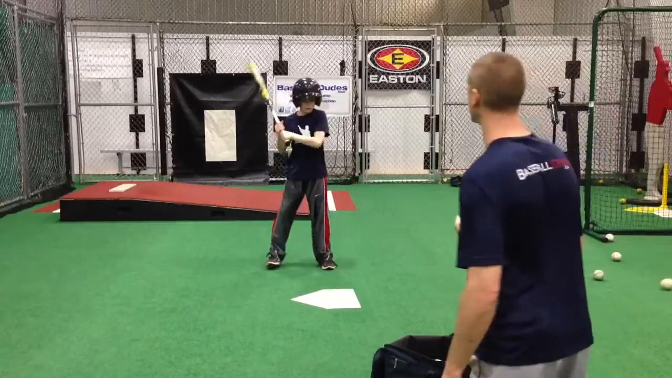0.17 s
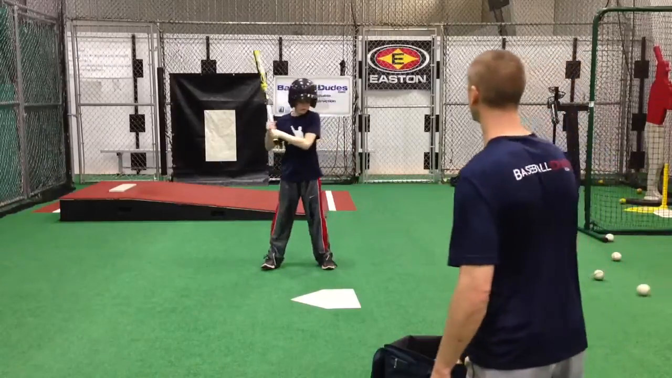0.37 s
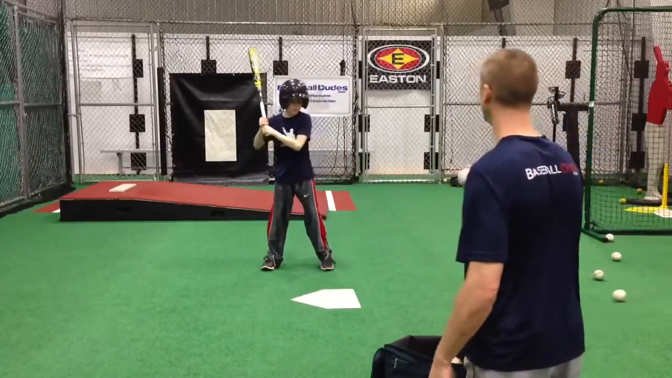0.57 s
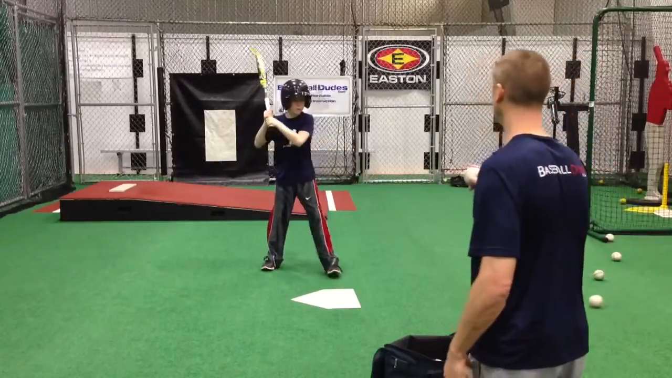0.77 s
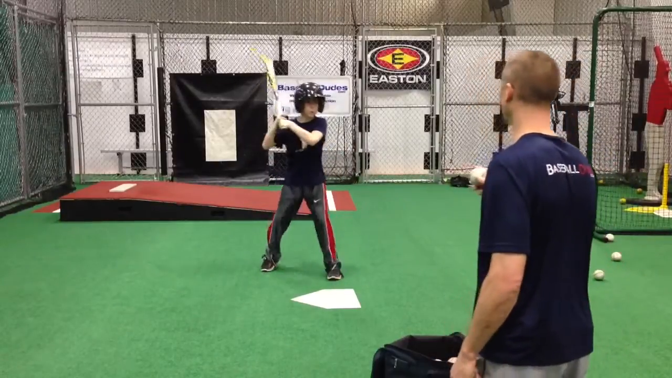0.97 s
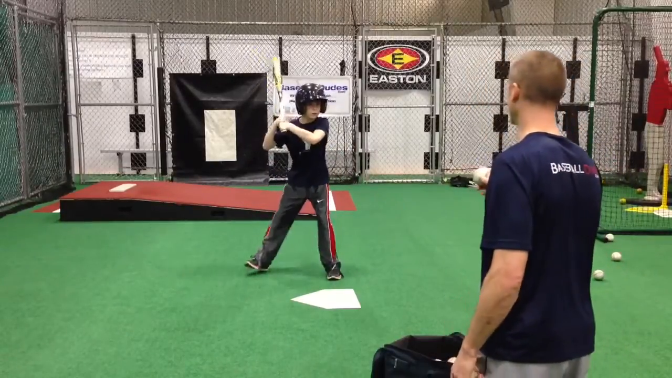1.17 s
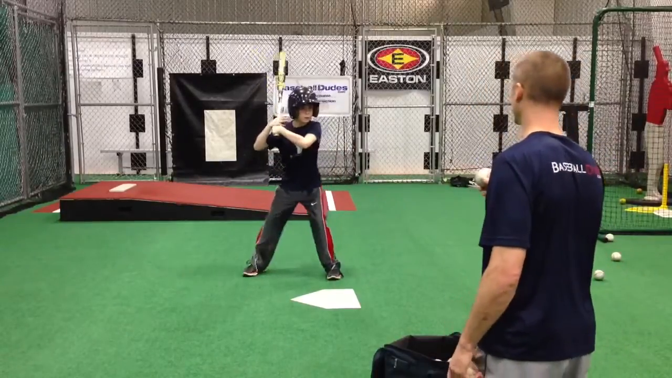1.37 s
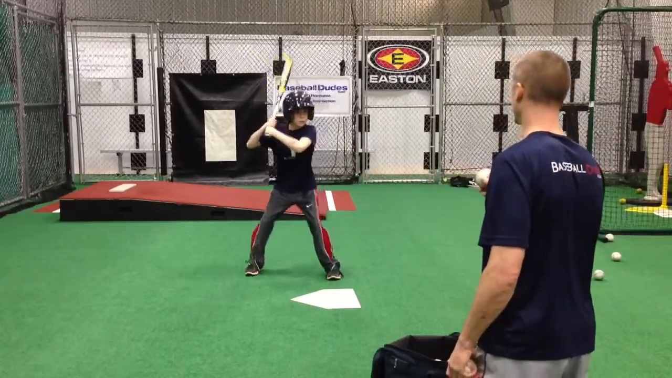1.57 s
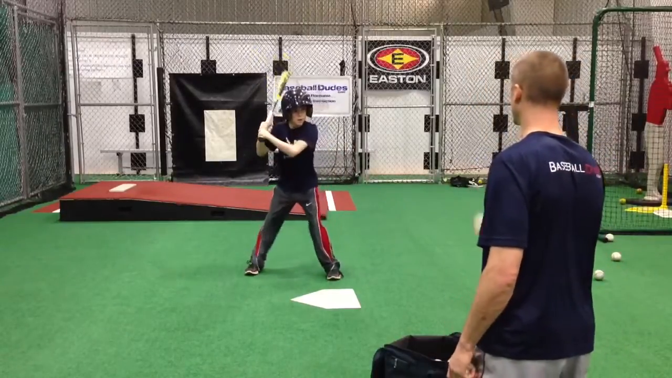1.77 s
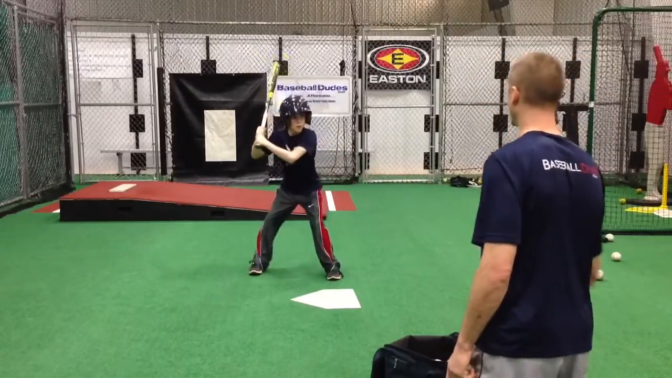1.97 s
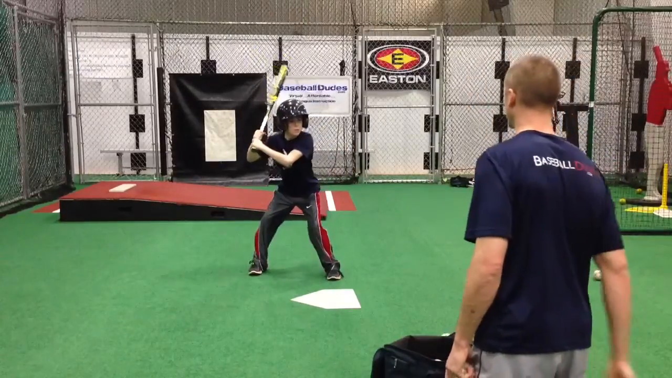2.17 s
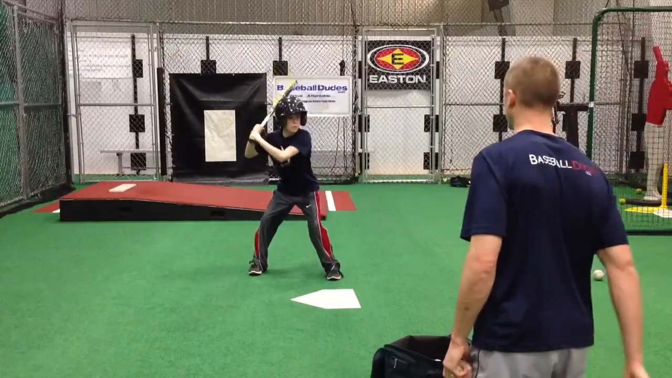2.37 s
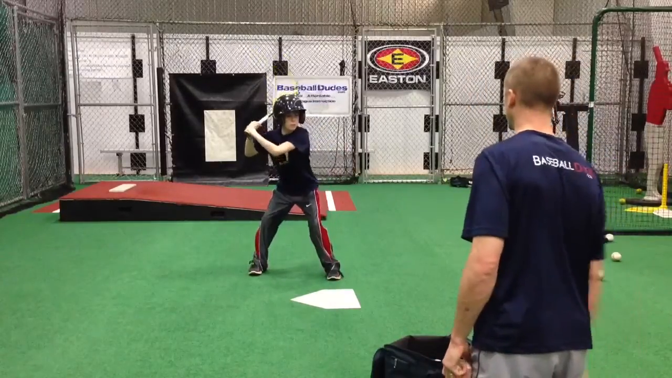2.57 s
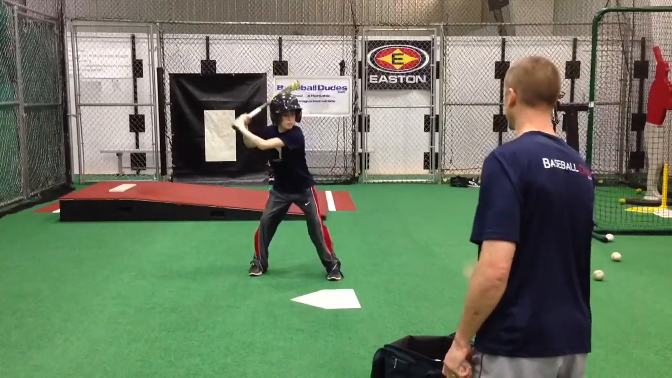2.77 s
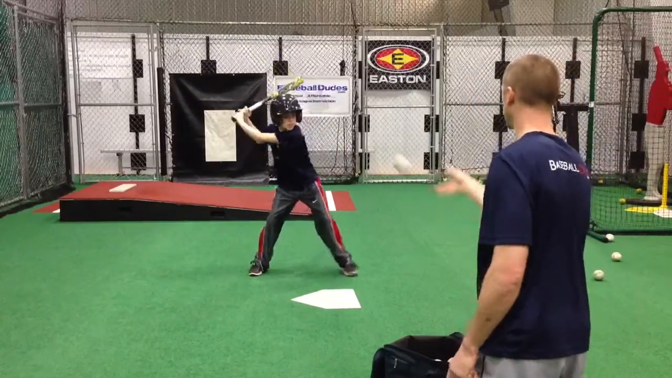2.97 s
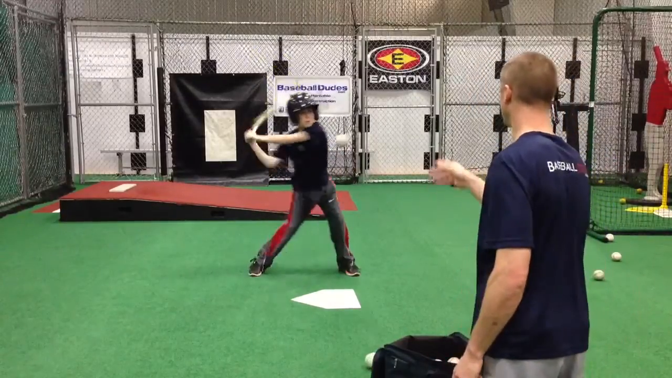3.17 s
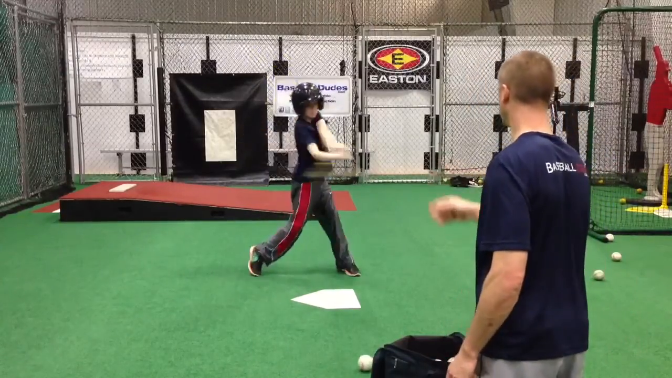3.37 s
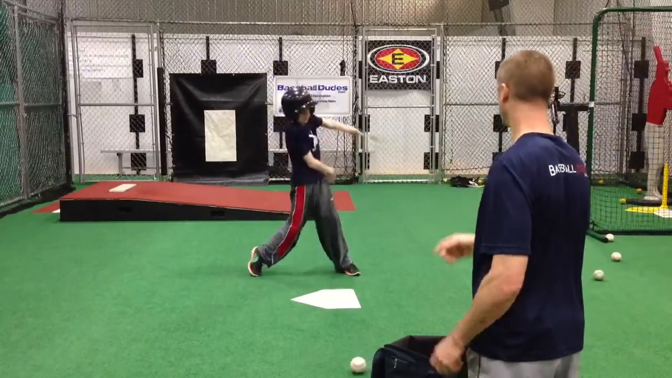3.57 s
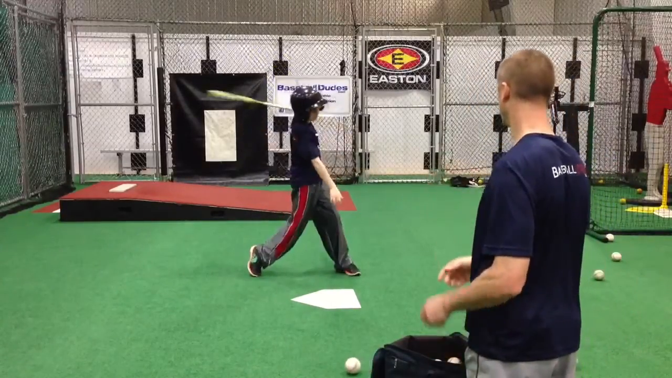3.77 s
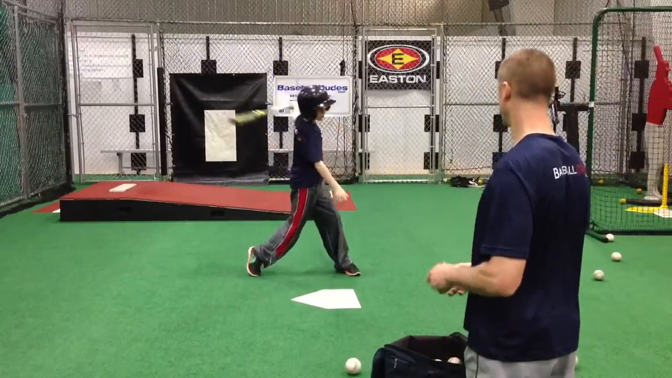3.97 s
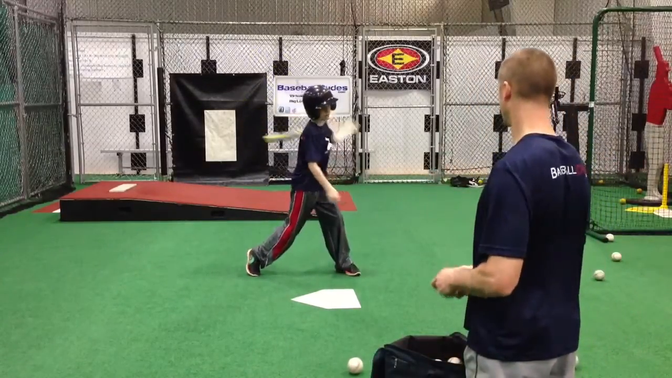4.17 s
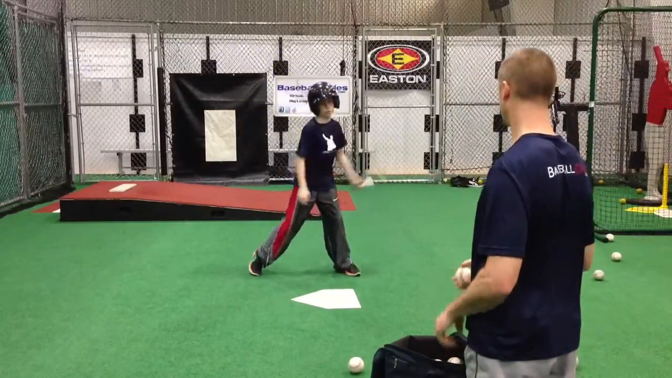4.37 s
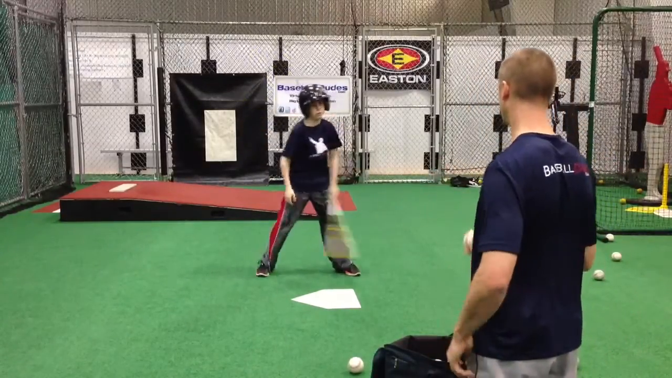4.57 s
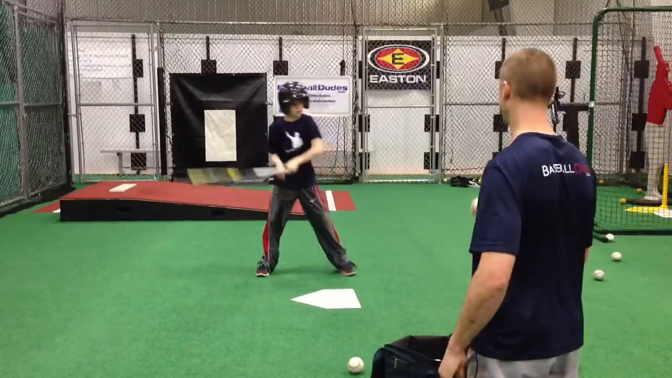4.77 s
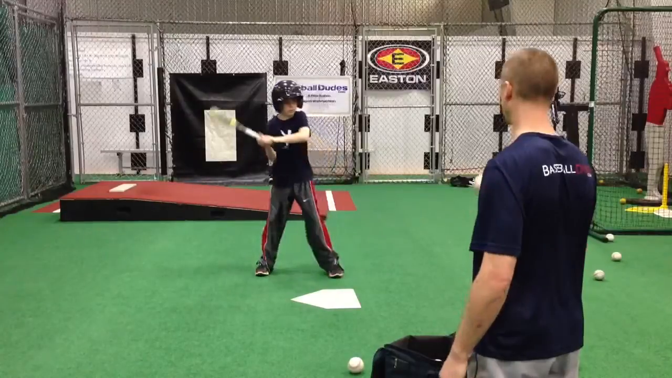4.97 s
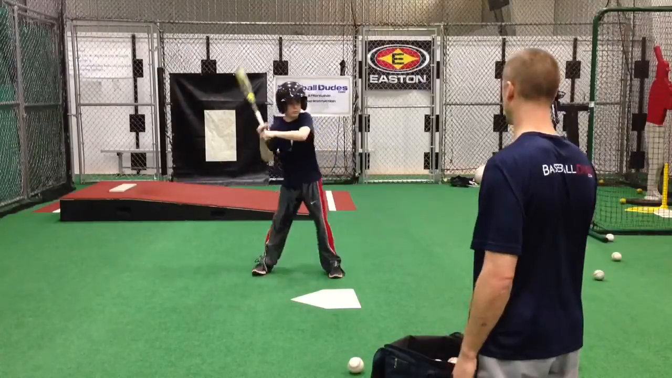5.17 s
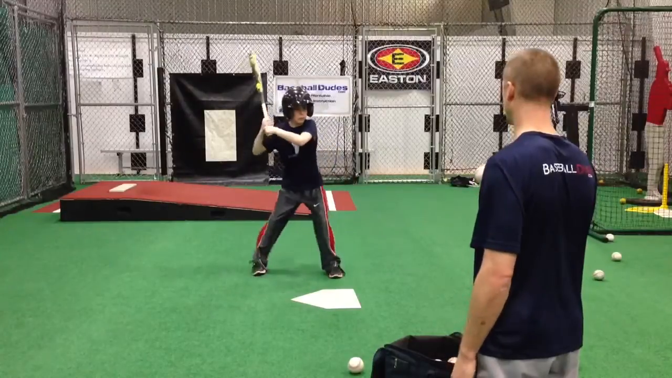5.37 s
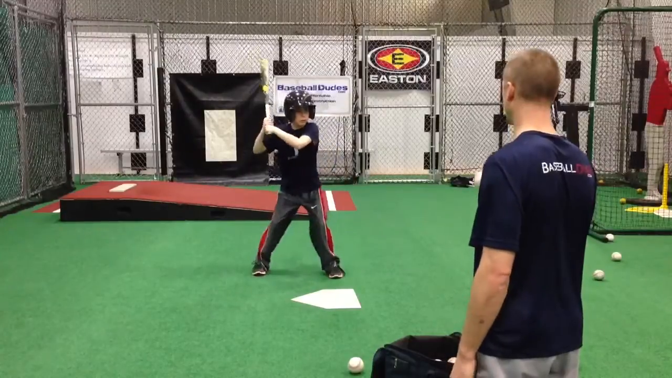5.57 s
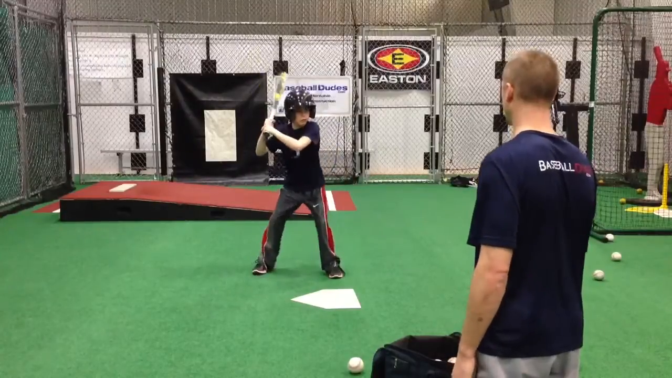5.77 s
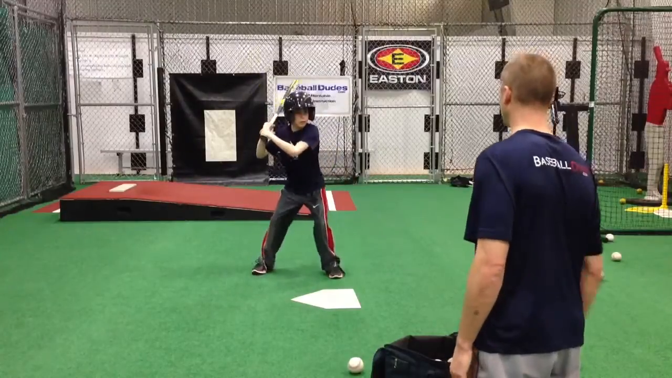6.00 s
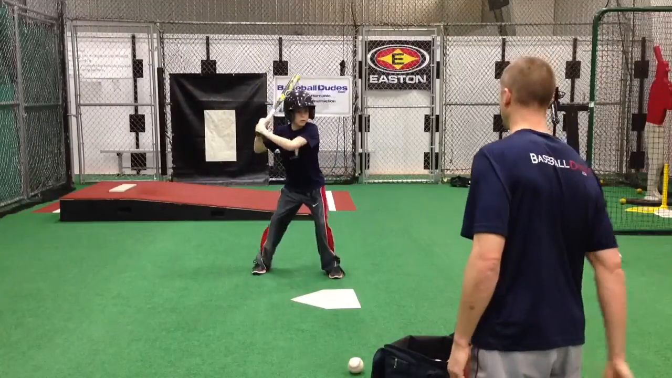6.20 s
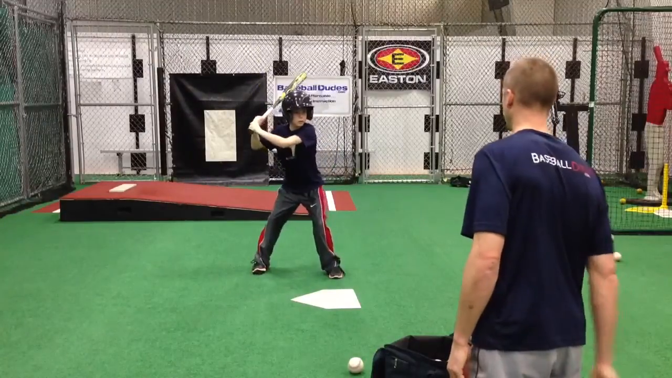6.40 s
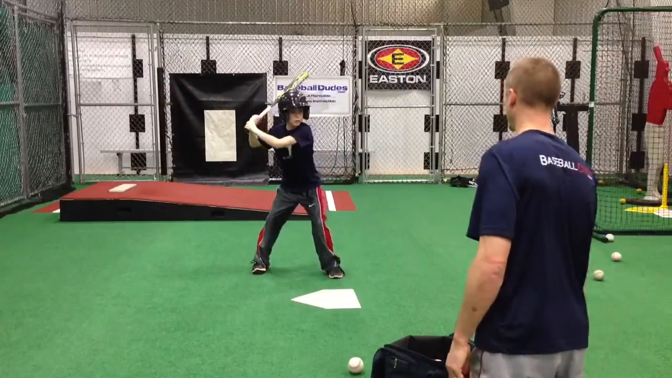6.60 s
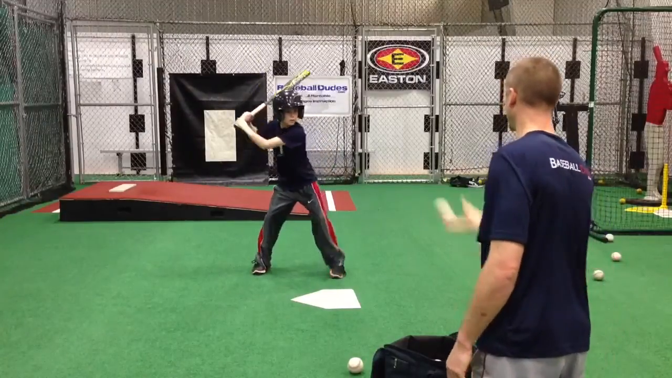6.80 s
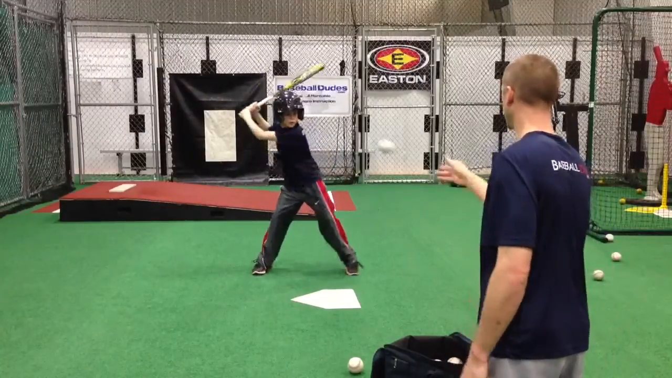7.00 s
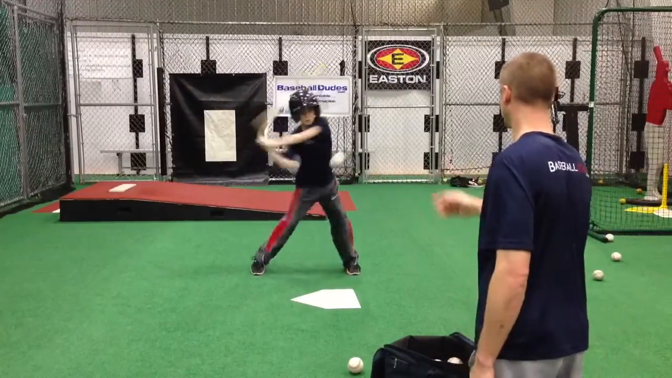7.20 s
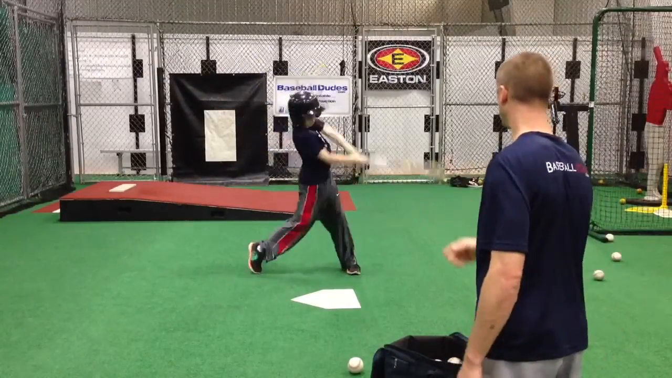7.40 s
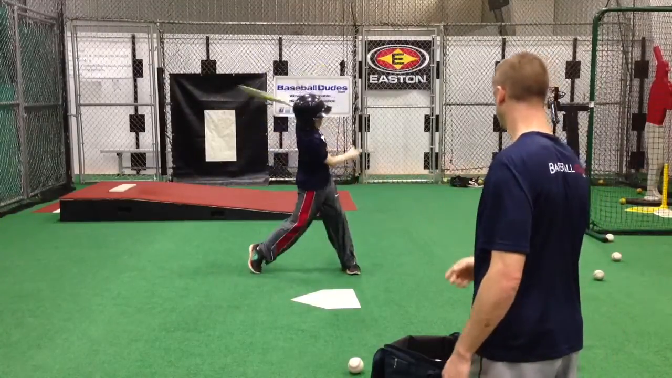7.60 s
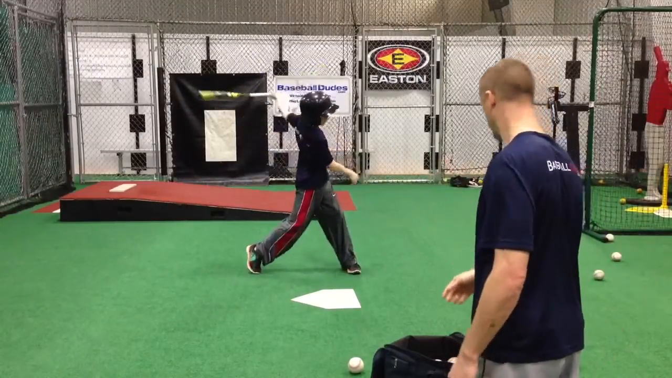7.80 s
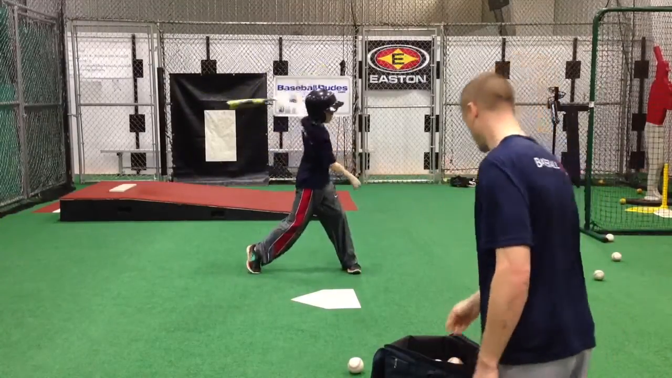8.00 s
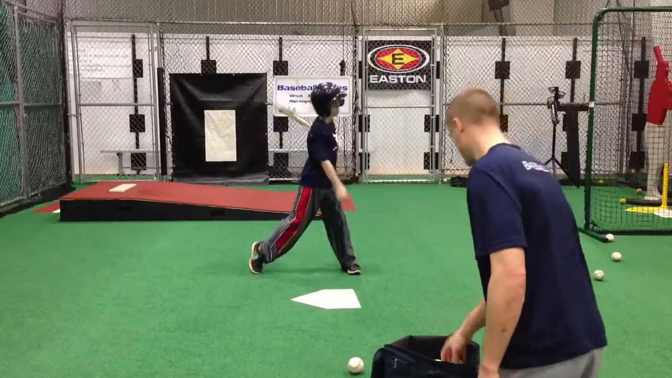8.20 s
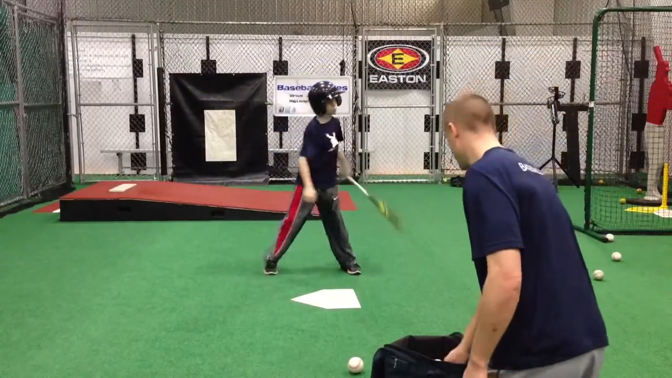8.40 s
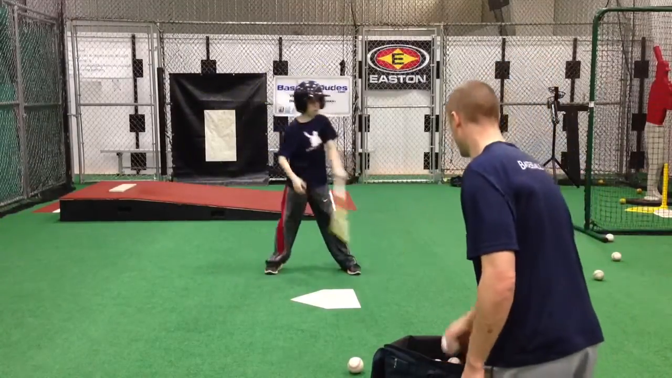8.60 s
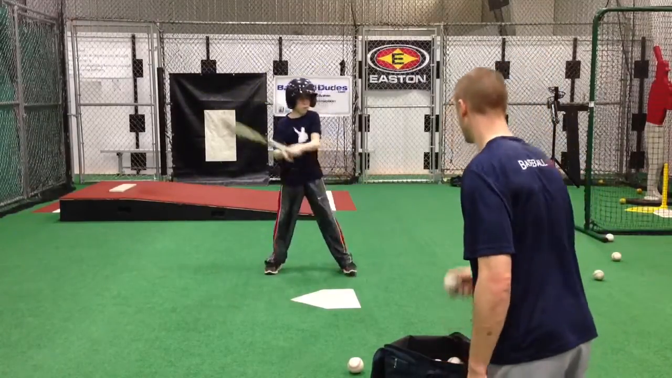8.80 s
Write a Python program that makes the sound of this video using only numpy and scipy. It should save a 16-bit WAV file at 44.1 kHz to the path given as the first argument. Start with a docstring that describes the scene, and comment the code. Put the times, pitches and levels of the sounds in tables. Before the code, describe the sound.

Batting practice inside a large, reverberant cage, heard from a fixed microphone a few metres away. Quiet air hum and soft scuffing come first, then an explosive metallic crack whose ping wavers off the walls. The ball snaps sharply into rattling mesh and thumps down close by, bouncing weaker. Several seconds later a second hit brings another mesh snap and a hollower thud.

```python
"""An indoor batting cage in a hard hall: a metal bat cracks against balls over ventilation hum and small scuffs.
Each crack is a noise burst plus short damped modes, loud enough to clip the microphone, with a slap echo.
The barrel rings on as it swings, so every wall hears its ping at another pitch.
The ball snaps into wire mesh that rattles, then knocks on the turf with damped modes and a floor rumble.
The hall is noise that dies band by band, faint until the far wall answers."""
import sys
import numpy as np
from scipy import signal
from scipy.fft import rfft, irfft
from scipy.io import wavfile
from scipy.ndimage import uniform_filter1d

SR = 44100
rng = np.random.default_rng(int(sys.argv[2]) if len(sys.argv) > 2 else 0)


def wav_record(signal):
    """Record a signal, one row per channel, as 16-bit PCM in the file named by sys.argv[1]."""
    frames = np.transpose(np.atleast_2d(signal))
    bounded = np.clip(frames, -1, 1)
    # unit amplitude maps onto the largest positive 16-bit level
    quanta = np.round(bounded * 32767).astype(np.int16)
    wavfile.write(sys.argv[1], SR, quanta)


N = 390285  # length in samples


def undb(db):
    """Amplitude factor of a level in dB."""
    return 10 ** (np.asarray(db) / 20)


def fall(size, t60_s):
    """Exponential decay that loses 60 dB in t60_s."""
    return np.exp(-np.log(1000) * np.arange(size) / SR / t60_s)


def add(track, sound, start_s):
    """Mix a sound into a track, cut off at the track's end."""
    start = max(int(start_s * SR), 0)
    track[start:start + len(sound)] += sound[:len(track) - start]


def low_cut(x, order, cutoff_hz):
    """Butterworth high-pass."""
    return signal.sosfilt(signal.butter(order, cutoff_hz, "high", fs=SR, output="sos"), x)


def on_log_axis(table, hz):
    """Read a two-column table between its points, on a logarithmic frequency axis."""
    table_hz, values = np.transpose(table)
    return np.interp(np.log(hz + 1), np.log(table_hz), values)


def colour(x, spectrum):
    """Causal filter with the given gains in dB, from the cepstrum of their logarithm."""
    gain_db = on_log_axis(spectrum, np.fft.rfftfreq(4096, 1 / SR))
    cepstrum = irfft(gain_db * np.log(10) / 20)
    # folding the second half onto the first puts all the energy after the onset
    cepstrum[1:2048] *= 2
    cepstrum[2049:] = 0
    impulse = irfft(np.exp(rfft(cepstrum)))[:2048]
    return signal.fftconvolve(x, impulse)[:len(x)]


def unit(x):
    """Scale to an RMS of 1."""
    return x / np.sqrt(np.mean(x ** 2))


def snap(spectrum, size):
    """One click with the given colour, peak 1."""
    click = colour(np.arange(size) == 0, spectrum)
    return click / np.max(np.abs(click))


def ring(modes, size, spread_db):
    """Sum of damped sine modes, each struck a little differently."""
    t = np.arange(size) / SR
    total = np.zeros(size)
    for pitch_hz, level_db, t60_s in modes:
        strength = undb(level_db + spread_db * rng.standard_normal())
        total += strength * np.sin(2 * np.pi * pitch_hz * t) * fall(size, t60_s)
    return total


def walk(rate_hz):
    """Wandering control signal: random levels held 1 / rate_hz seconds and slewed twice, spread near 1."""
    hold = int(SR / rate_hz)
    steps = np.repeat(rng.standard_normal(N // hold + 1), hold)
    return 1.1 * uniform_filter1d(uniform_filter1d(steps, hold), hold)[:N]


# how long the hall rings in each band: freq_hz [Hz], t60_s [s]
HALL_DECAY = [(125, 0.12), (350, 2), (900, 2.35), (1900, 2.21), (3500, 1.74), (6000, 1.2), (10000, 0.86),
              (15000, 0.27)]
EARLY_DB, EARLY_T60_S = 19.5, 0.2  # first dense echoes, over the late tail
BEFORE_DB = -11  # turf and nets, before the far wall answers
SLAP_S, NEAR_SLAP_S = .029, .039  # far wall's delay for a sound at the plate, and near the microphone


def hall(x, slap_s=SLAP_S):
    """Echoes of a short sound: faint until the far wall answers, then noise that dies band by band."""
    size = 1 << 16
    freq_hz, t, bands = signal.stft(rng.standard_normal(size), SR, nperseg=256)
    decay = undb(-60 * t / on_log_axis(HALL_DECAY, freq_hz)[:, None])
    tail = signal.istft(bands * decay, SR)[1][:size]
    tail *= 1 + undb(EARLY_DB) * fall(size, EARLY_T60_S)
    wall_times_s = [slap_s - .002, slap_s + 0.0021]
    tail *= undb(np.interp(np.arange(size) / SR, wall_times_s, [BEFORE_DB, 0]))
    return signal.fftconvolve(x, tail / 30)


# tone of the ventilation: freq_hz [Hz], level_db [dB per Hz, relative]
AIR_COLOUR = [(24, -71), (40, -60), (69, -41), (96, -15.5), (202, -4.5), (301, -8), (407, -2.5), (591, -5),
              (758, -1.5), (2450, -8.5), (3470, -7), (5860, -19), (14000, -22), (15500, -26.5)]
AIR_DB = -51.5  # overall RMS level


def air():
    """Ventilation: overlapping octave bands of noise that swell a little together and flicker alone."""
    noise = rfft(colour(rng.standard_normal(N), AIR_COLOUR))
    octave = np.log2(np.fft.rfftfreq(N, 1 / SR) / 62.5 + 1e-9)
    swell = walk(0.94)
    total = np.zeros(N)
    for k in range(-1, 10):
        crossfade = np.clip(1 - np.abs(octave - k), 0, 1)
        total += irfft(noise * crossfade, N) * undb(1.3 * swell + 0.12 * walk(3.8))
    return undb(AIR_DB) * unit(total)


# thin short tones: peak_s [s], level_db [dB], half_length_s [s], pitch_hz [Hz]
TONE_EVENTS = [(3.85, -44.5, 0.048, 6850)]
TONE_HALL_DB = -22


def tone(level_db, half_length_s, pitch_hz):
    """A brief sine with a slight waver, which the hall draws out."""
    size = int(2 * half_length_s * SR)
    waver = 1 + 0.0087 * unit(uniform_filter1d(rng.standard_normal(size), 300))
    phase = 2 * np.pi * np.cumsum(pitch_hz * waver) / SR
    direct = np.sin(phase) * np.hanning(size)
    wet = undb(TONE_HALL_DB) * hall(direct)
    add(wet, direct, 0)
    return undb(level_db) * wet


# shoes and cloth scuffing: peak_s [s], level_db [dB], half_length_s [s], centre_hz [Hz]
SCUFF_EVENTS = [(.29, -52, 0.057, 3800), (.35, -50.5, 0.037, 3800), (.405, -49.5, 0.045, 4200),
                (1.35, -61.5, 0.33, 4500), (4.54, -51, 0.0092, 6040), (5.72, -55.5, 0.11, 3220),
                (7.27, -52.5, 0.12, 3130)]


def scuff(level_db, half_length_s, centre_hz):
    """Friction as gritty noise around one band, swelling and fading."""
    size = int(2 * half_length_s * SR)
    grit = rng.standard_normal(size) * undb(2 * rng.exponential(size=size))
    band = [(centre_hz / 3, -30), (centre_hz / 1.4, 0), (centre_hz * 1.3, -3),
            (centre_hz * 2.2, -15), (20000, -40)]
    return undb(level_db) * unit(colour(grit, band)) * np.hanning(size)


# ball dropping, knocking about and bouncing on the turf: start_s [s], level_db [dB],
# treble_db, hollow_db, echoes_db [dB, relative to the knock], pitch [ratio]
DROP_EVENTS = [(4.4278, -12.5, -6, -3, -15.5, 0.97), (4.8985, -26, -16, -4, -14.5, 0.89),
               (5.2005, -39.5, -7, 0, -20, 1.23), (8.5205, -19, -7.5, 7, -7.5, 1.14),
               (8.632, -33, -24, 3, -18, 0.88), (8.748, -36, -22, 4, -6, 1.17)]
# modes of the knock, the first three dull, the rest bright:
# pitch_hz [Hz, before the pitch ratio], level_db [dB], t60_s [s]
KNOCK_MODES = [(244, -18, 0.077), (516, -3, 0.008), (994, -5, 0.013), (2180, -3, 0.012),
               (3040, 14.5, 0.0017), (3800, 9, 0.0026)]
# ring of the hollow under the turf: pitch_hz [Hz, before the pitch ratio], level_db [dB], t60_s [s]
HOLLOW_MODES = [(332, -17, 0.049), (560, -13.5, 0.054)]
# tone of the floor rumbling on: freq_hz [Hz], gain_db [dB, relative]
RUMBLE_COLOUR = [(50, -41), (140, -2), (300, -3.5), (550, -10), (850, -13), (1500, -54), (5000, -43.5)]
# dull echoes that follow each landing: delay_s [s], level_db [dB, on top of echoes_db]
DULL_ECHOES = [(.061, -1.5), (.151, -8)]
RUMBLE_DB, RUMBLE_T60_S, DROP_HALL_DB = -9, .55, -0.5  # levels on top of echoes_db
TURF_ECHO_S, TURF_ECHO_DB = 0.00195, 0.5


def drop(level_db, treble_db, hollow_db, echoes_db, pitch):
    """A knock softened by its contact, a dull turf echo, hollow wall echoes and the floor rumbling on."""
    size = 16000
    contact = np.hanning(int(0.0002 * SR) + 2)
    contact /= contact.sum()
    modes = np.multiply(KNOCK_MODES, [pitch, 1, 1])
    thud = np.convolve(ring(modes[:3], size, 0.14), contact)
    smack = undb(treble_db) * np.convolve(ring(modes[3:], size, 0.14), contact)
    hollow = ring(np.multiply(HOLLOW_MODES, [pitch, 1, 1]), size, 1.5)
    lumps = undb(2.5 * unit(uniform_filter1d(rng.standard_normal(size), 300)))
    rumble = unit(colour(rng.standard_normal(size) * lumps, RUMBLE_COLOUR)) * fall(size, RUMBLE_T60_S)

    # the smack enters with opposite polarity
    wet = undb(DROP_HALL_DB + echoes_db) * hall(undb(-13) * thud - smack, slap_s=NEAR_SLAP_S)
    add(wet, thud - smack, 0)
    add(wet, undb(TURF_ECHO_DB) * thud, TURF_ECHO_S)
    add(wet, undb(hollow_db) * hollow, .003)
    for delay_s, echo_db in DULL_ECHOES:
        add(wet, undb(echoes_db + echo_db) * (undb(10.5) * hollow + thud[:size]), delay_s)
    add(wet, undb(RUMBLE_DB + echoes_db) * rumble, .001)
    # a small ball moves little air at the longest wavelengths
    return undb(level_db) * low_cut(wet, 3, 115)


# ball into the wire mesh: start_s [s], level_db [dB], rattle_db [dB, relative], pitch [ratio],
# echo_s [s, delay of the floor echo]
MESH_EVENTS = [(3.6263, -5.5, -24.5, 0.88, .0064), (7.5883, -2, -26.5, 1.0, .0033)]
# tone of the wires: freq_hz [Hz, before the pitch ratio], gain_db [dB, relative]
MESH_COLOUR = [(1290, -25), (2200, -14.5), (4080, 1.5), (4570, -3), (5280, 0.5), (7110, -3), (8970, -9.5),
               (15000, -39)]


def mesh(level_db, rattle_db, pitch, echo_s):
    """A bright snap with its echo off the floor, then wires that tick against each other."""
    size = 12000
    click = snap(np.multiply(MESH_COLOUR, [pitch, 1]), size)
    ticks = rng.standard_normal(size) * undb(2 * rng.exponential(size=size)) * fall(size, 0.17)
    # the wires take a moment to start swinging
    ticks *= np.minimum(1, np.arange(size) / SR / 0.0099)
    rattle = signal.fftconvolve(ticks, click)[:size]
    wet = undb(-12) * hall(click, slap_s=0.033)
    add(wet, click + undb(rattle_db) * rattle, 0)
    add(wet, 0.55 * click, echo_s)
    return undb(level_db) * wet


# hoop ring of each blow, in the order of the blows: hall_db [dB], wall_1_db, wall_2_db, wall_3_db [dB]
PING_LEVELS = [(-14, -31, -20, -23), (-11, -6, -13.5, -17.5)]
# walls that return the ring clearly: delay_s [s after the blow],
# towards [share of the barrel speed towards that wall]
PING_WALLS = [(.030, 0.79), (.068, -0.793), (.098, .82)]
PING_HZ, PING_T60_S = 1895, 0.36  # hoop mode of the barrel at rest
SWING_M_S, SOUND_M_S = 13.62, 343  # speeds of the barrel and of sound
HUM_DB, HUM_T60_S = -23, 3.2  # faint late ring of the barrel
AHEAD_DB = 2.5  # walls ahead of the swing get more, those behind less
RETURN_RISE_S, RETURN_HOLD_S, RETURN_T60_S = 0.0023, 0.018, 0.18  # envelope of each clear return


def ping(hall_db, *walls_db, count=10):
    """The moving barrel sends its ring higher ahead and lower behind: pitch times 1 + speed cos(angle) / 343."""
    doppler = SWING_M_S / SOUND_M_S
    size = 60000
    t = np.arange(size) / SR
    phase = 2 * np.pi * PING_HZ * t
    fade = fall(size, PING_T60_S) + undb(HUM_DB) * fall(size, HUM_T60_S)

    # the hall hears the ring sent out at every angle
    far = 0
    for angle in (np.arange(count) + .5) * np.pi / count:
        shifted = np.sin(phase * (1 + doppler * np.cos(angle))) * fade
        far = far + undb(AHEAD_DB * np.cos(angle)) * hall(shifted)
    far *= undb(hall_db) / count

    rise = np.minimum(1, t / RETURN_RISE_S)
    decay = undb(-60 * np.maximum(t - RETURN_HOLD_S, 0) / RETURN_T60_S)
    envelope = np.sqrt(2) * rise * decay
    for (delay_s, towards), wall_db in zip(PING_WALLS, walls_db):
        add(far, undb(wall_db) * envelope * np.sin(phase * (1 + doppler * towards)), delay_s)
    return far


# bat on ball: start_s [s], level_db [dB], hall_db [dB], slap_db [dB, off the far wall]
BLOW_EVENTS = [(3.362, -0.5, -5, -14.5), (7.3161, -2, -2.5, -12.5)]
# short modes of barrel and ball: pitch_hz [Hz], level_db [dB, before the low cut], t60_s [s]
BARREL_MODES = [(820, -38, 0.04), (898, 4.5, 0.027), (1884, -5.5, 0.061), (2600, -8, 0.047),
                (2970, -2, 0.016), (3290, 10, 0.0037), (4200, -4, 0.011), (4910, -13.5, 0.044),
                (5700, -46, 0.038)]
# upper modes of the barrel wall, long enough to colour the hall:
# pitch_hz [Hz, before the swing's shift], level_db [dB, relative], t60_s [s]
SHELL_MODES = [(958, -33, 0.057), (2647, -26.5, 0.078), (2910, -23, 0.036), (3300, -24, 0.068),
               (4200, -35, 0.035), (5000, -26.5, .06), (5470, -26.5, 0.06)]
# tone of the crack: freq_hz [Hz], gain_db [dB, relative]
CRACK_COLOUR = [(100, -85), (400, -23.5), (1000, 6.5), (3500, 4), (6000, -2.5), (10000, -17),
                (16000, -26.5)]
# the blow averaged over all directions, as the walls hear it: freq_hz [Hz], gain_db [dB, relative]
ALL_ROUND_COLOUR = [(100, -33.5), (500, -22), (940, 2), (1300, -6.5), (2600, -2), (3400, 2.5), (4900, -3),
                    (5800, -5), (8000, -17.5), (12000, -29.5), (16000, -29)]
CRACK_DB, CRACK_T60_S = -1.5, 0.031
SLAP_T60_S = 0.083  # the uneven far wall draws the crack out


def crack(size, t60_s):
    """Coloured noise burst of the impact, dying away at once."""
    return unit(colour(rng.standard_normal(size), CRACK_COLOUR)) * fall(size, t60_s)


def blow(level_db, hall_db, slap_db):
    """Impact of bat on ball: crack and short modes, a brighter slap off the far wall, then the hall."""
    size = 4000
    # walls ahead of and behind the swing hear the shell modes shifted
    shell = np.zeros(size)
    for side in (-1, 0, 1):
        shell += ring(np.multiply(SHELL_MODES, [1 + side * 0.013, 1, 1]), size, 0.62)
    wet = undb(hall_db) * hall(snap(ALL_ROUND_COLOUR, size) + undb(-6.0) * shell)
    direct = undb(CRACK_DB) * crack(size, CRACK_T60_S) + ring(BARREL_MODES, size, 0.5)
    add(wet, direct, 0)
    # the slap leaves out the three lowest modes
    slap = crack(size, SLAP_T60_S) + ring(BARREL_MODES[3:], size, 2)
    add(wet, undb(slap_db) * slap, SLAP_S)
    # the blow carries little below 600 Hz
    return undb(level_db) * low_cut(wet, 2, 600)


def scene():
    """Lay every event over the ventilation."""
    out = air()
    for events, source in ((TONE_EVENTS, tone), (SCUFF_EVENTS, scuff)):
        for peak_s, level_db, half_length_s, hz in events:
            add(out, source(level_db, half_length_s, hz), peak_s - half_length_s)
    for events, source in ((DROP_EVENTS, drop), (MESH_EVENTS, mesh)):
        for start_s, *settings in events:
            add(out, source(*settings), start_s)
    for (start_s, *settings), levels_db in zip(BLOW_EVENTS, PING_LEVELS):
        add(out, ping(*levels_db), start_s)
        add(out, blow(*settings), start_s)
    return out[None]


TOP_HZ = 16000  # upper limit of the sound


def record(dry):
    """The microphone clips the cracks, the deep bass drops out, the converter clips again and the top is cut."""
    microphone = np.clip(dry, -.95, .95)
    converter = np.clip(low_cut(microphone, 3, 75), -.91, .91)
    top_cut = signal.ellip(12, .2, 100, TOP_HZ, fs=SR, output="sos")
    return signal.sosfilt(top_cut, converter)


dry = scene()
out = record(dry)
wav_record(out)
```